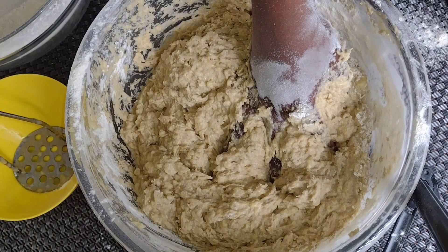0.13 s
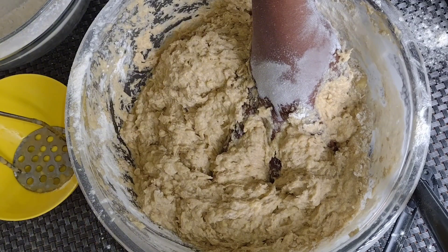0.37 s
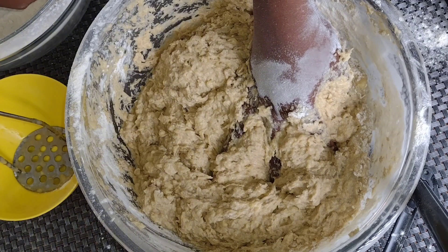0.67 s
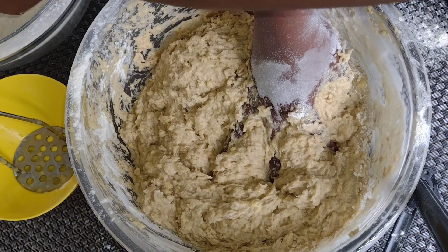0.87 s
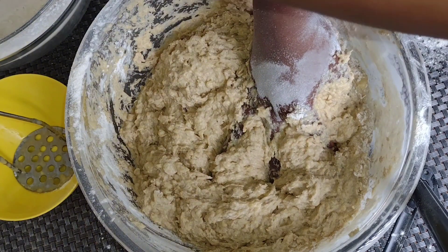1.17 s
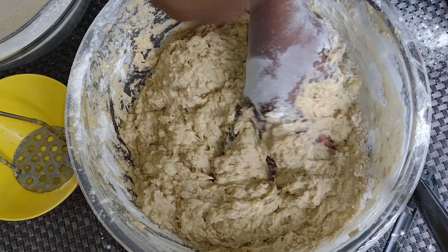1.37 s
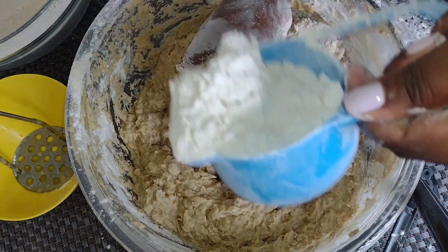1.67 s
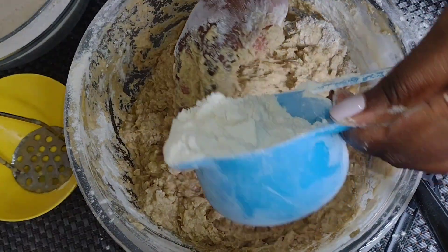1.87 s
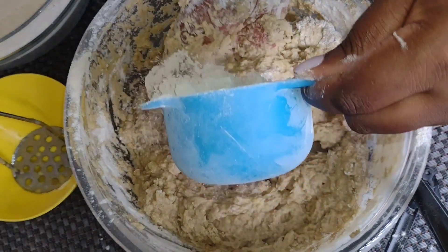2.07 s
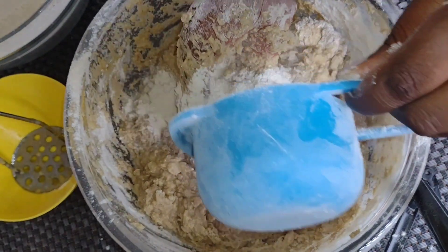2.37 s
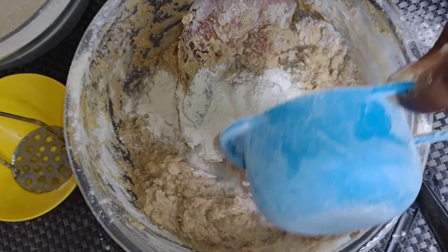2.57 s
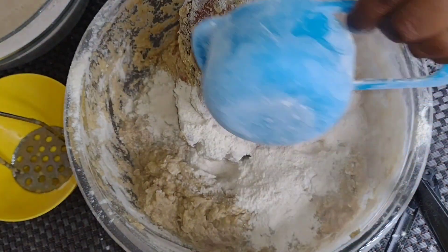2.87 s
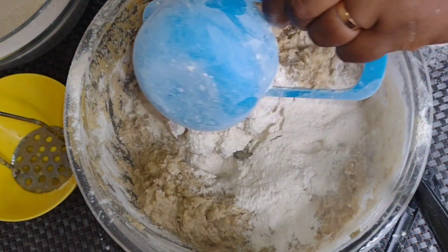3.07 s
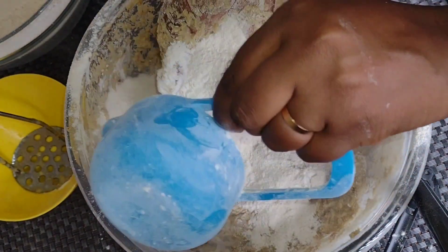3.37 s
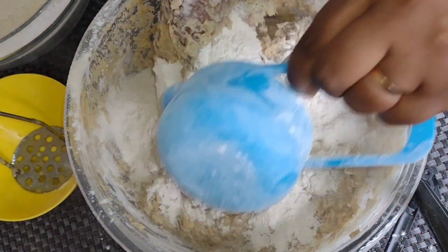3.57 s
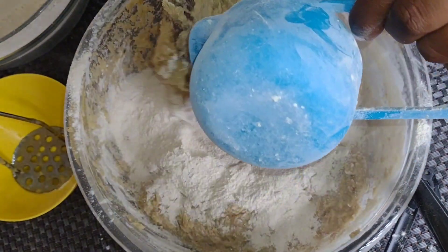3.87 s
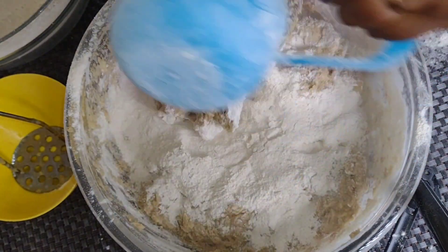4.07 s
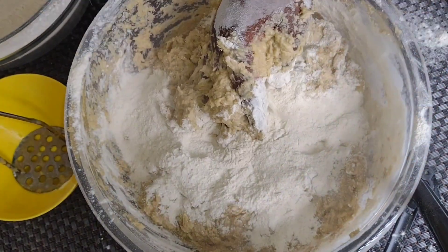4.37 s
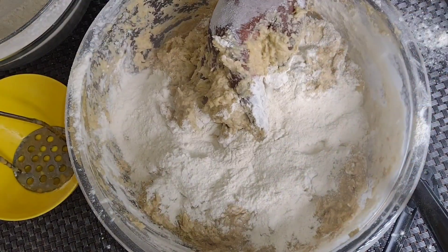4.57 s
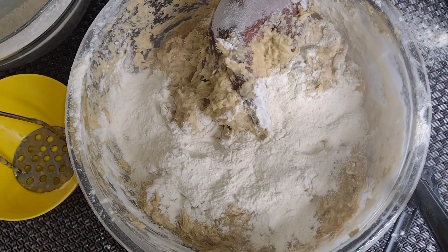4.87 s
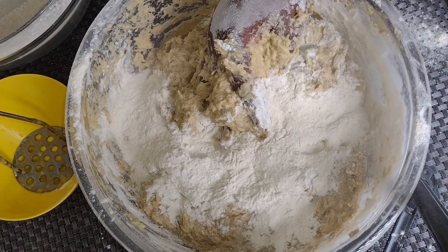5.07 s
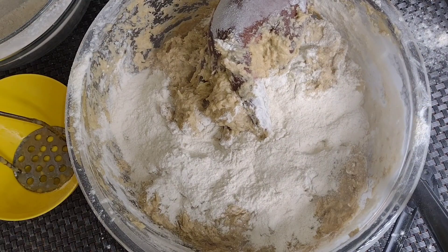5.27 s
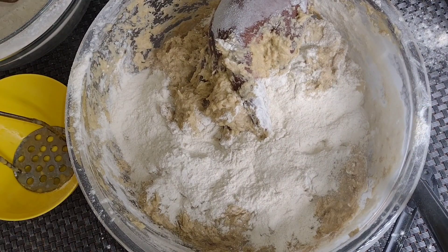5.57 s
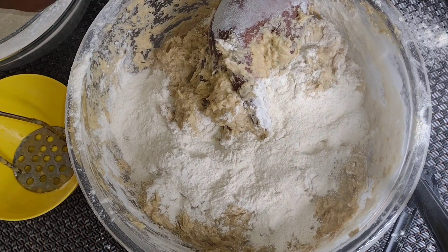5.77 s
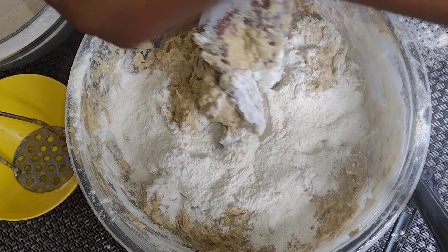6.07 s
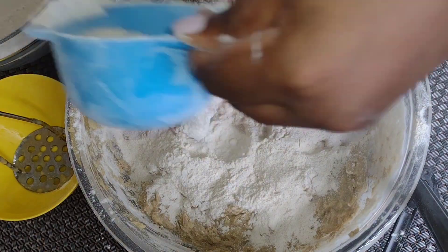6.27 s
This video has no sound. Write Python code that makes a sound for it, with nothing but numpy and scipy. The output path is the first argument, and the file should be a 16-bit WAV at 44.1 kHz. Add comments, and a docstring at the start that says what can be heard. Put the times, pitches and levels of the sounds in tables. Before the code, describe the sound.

Quiet kitchen with a low throbbing hum; flour hisses and a cup bumps the dough bowl, then a loud, high bird trill rises and slows.

```python
"""From the start a kitchen rumbles and hisses softly under a low, throbbing hum; a bird peeps, others whistle far off.
A hand pushes the dough with dull, low noise; flour and sticky dough hiss in fine grains and tick.
Then hand and plastic cup rub dough and bowl: bursts of tiny slips that ring the bowl's damped resonances.
The bird swells into a rising two-voiced trill that slows and rings round the room, built from swept sines.
At its height a second bird joins in with shorter, evenly spaced calls."""
import sys
import numpy as np
from scipy import signal
from scipy.fft import rfft, irfft, next_fast_len
from scipy.io import wavfile

SR = 44100
rng = np.random.default_rng(int(sys.argv[2]) if len(sys.argv) > 2 else 0)


def file_out(sig):
    """Save sig as 16-bit WAV at sys.argv[1]."""
    # one column per channel
    cols = np.atleast_2d(sig).T
    # limit, then scale
    lim = np.clip(cols, -1, 1)
    pcm = np.round(lim * 32767).astype(np.int16)
    wavfile.write(sys.argv[1], SR, pcm)


N = 283122
TIME = np.arange(N) / SR

# Swell of the room's low rumble. Each row: time in seconds, level in dB before the rumble's trim.
RUMBLE_SWELL = [(0.0, -61), (1.66, -63), (1.77, -57.5), (3.59, -63), (4.08, -57), (5.63, -59),
                (6.24, -51.5), (6.42, -59)]
# Spectrum of the rumble. Each row: frequency in Hz, relative gain in dB.
RUMBLE_COLOUR = [(15, -69), (25, -37), (91, -4.5), (128, 1.5), (142, -1), (162, -11), (195, -21),
                 (264, -13), (346, -15), (423, -20), (501, -18), (583, -23), (679, -17.5), (738, -23.5),
                 (1400, -38), (1820, -42), (3080, -120)]
# Resonances of the room. Each row: frequency in Hz, width in Hz, level in dB.
ROOM_MODES = [(100.4, 60, -76.5), (178.7, 17, -70.5), (273.5, 4.5, -75), (343.6, 4.7, -70.5)]
# Spectrum of the thin hiss. Each row: frequency in Hz, relative gain in dB.
AIR_COLOUR = [(300, -6), (1000, 0), (1600, -3), (2600, -3.5), (4500, -9.5), (8000, -13.5), (15500, -15.5)]
# Likeness of the room noise at both ears. Each row: frequency in Hz, left-right correlation.
EAR_LIKENESS = [(60, .99), (150, .98), (280, .78), (500, .42), (1000, -.1), (2500, 0), (16000, 0)]
# Swell of the hum. Each row: time in seconds, level in dB before the hum's trim and throb.
HUM_SWELL = [(0, -60), (.7, -58.5), (1.2, -64.5), (1.95, -54), (2.5, -61.5), (3.8, -56.5), (4.16, -44.5),
             (4.38, -57.5), (5.35, -50.5), (5.8, -54.5), (6.13, -40), (6.42, -55)]
# Far whistles. Each row: start in seconds, middle pitch in Hz, level in dB.
FAR_WHISTLES = [(0.045, 2500, -73.5), (.26, 2135, -79), (.76, 2344, -76), (1.2, 2353, -75),
                (1.629, 2970, -74), (2.1, 3020, -68.5), (2.59, 2990, -67.5), (2.96, 6300, -68),
                (3.175, 2393, -71.5), (3.39, 5520, -63)]
# Dull pushes of the hand into the dough. Each row: start in seconds, length in seconds, centre in Hz, level in dB.
PUSHES = [(0.447, 0.52, 366, -61.5), (1.777, 0.28, 228, -66), (3.148, 0.19, 322, -61),
          (4.021, 0.18, 226, -55)]
# Soft hisses of flour and sticky dough. Each row: start in seconds, length in seconds, centre in Hz, level in dB.
HISSES = [(.86, .08, 8000, -76), (1.441, .36, 6900, -69), (1.99, .093, 3060, -64.5),
          (2.076, 0.09, 5170, -66), (2.378, .18, 4730, -70), (2.497, 0.53, 5100, -76),
          (3.06, .66, 5550, -67.5), (3.299, 2.4, 4700, -73.5)]
# Sticky ticks. Each row: start in seconds, level in dB before a lift of 3 dB.
TICKS = [(1.461, -68), (1.588, -68), (1.653, -64), (1.697, -68), (1.918, -69), (2.136, -67), (3.14, -69)]
# Rubs of hand and cup on dough and bowl. Each row: start in seconds, time to fall 60 dB in seconds, level in dB.
RUBS = [(1.753, 0.58, -48), (2.0, 1.05, -72), (2.142, 0.28, -63.5), (2.235, 0.46, -59.5), (3.4, 0.081, -69),
        (4.15, 1.14, -62.5), (4.49, 0.97, -69), (4.67, 0.7, -69), (5.95, 2.7, -68.5)]
# Spectrum of the rubbing slips. Each row: frequency in Hz, relative gain in dB.
RUB_COLOUR = [(240, -53), (400, -33), (593, -2), (867, 1.5), (1010, -14), (1090, -13.5), (3010, -5),
              (3450, -12), (6820, -17), (15000, -38.5)]
# Bowl resonances before the dough damps them. Each row: frequency in Hz, width in Hz, relative gain in dB.
BOWL_MODES = [(778, 15, 3.5), (1110, 62, 9.5), (1950, 200, -1), (2410, 100, -3), (3220, 59, -58),
              (5430, 63, -23)]
# Single peeps. Each row: start in seconds, length in seconds, end pitch in Hz, level in dB.
PEEPS = [(0.0, 0.015, 7370, -59), (0.132, 0.032, 7130, -66), (.3, 0.043, 7190, -73),
         (0.461, .044, 7180, -74.5), (0.976, 0.038, 7920, -62), (1.268, .085, 7850, -69.5),
         (1.504, .077, 7520, -70.5), (1.681, 0.076, 7200, -66.5), (1.922, .074, 7120, -66),
         (2.214, 0.096, 6900, -73)]
# The trill, slowing as it goes. Each row: start of a rising syllable in seconds.
TRILL_STARTS = [3.552, 3.7, 3.855, 4.022, 4.171, 4.339, 4.512, 4.678, 4.851, 5.032, 5.22, 5.428, 5.65,
                5.885, 6.115, 6.35]
# Loudness of the trill. Each row: time in seconds, level in dB.
TRILL_LEVEL = [(3.55, -54.5), (4.17, -52.5), (4.55, -48), (5.2, -36.5), (5.42, -35), (5.9, -41),
               (6.36, -43.5)]

AIR_DB = -73.3
# the hum's even throb, with random unsteadiness on top
THROB_GAP_S, THROB_CREST_S, THROB_DB, UNSTEADY_DB = .355, 4.9, 3, 2.5
WHISTLE_S = .135
HISS_WIDTH_HZ, HISS_MIDDLE_HZ = 4000, 4770  # width at a middling centre; higher hisses spread much wider
CLUMP_DB, CLUMP_RATE_HZ = 2.2, 40  # the grains come in clumps
RUB_RISE_SHARE = .041  # of the fall time: slow strokes also start slowly
PEEP_FOOT_HZ = 6620  # every peep rises from here
PAUSE_S = .052  # between syllables, so they lengthen as the trill slows
SCATTER = .0201  # of pitch, from one syllable to the next
SOFT_DB, EFFORT_RANGE_DB = -52, 10  # effort goes from 0 to 1 over this range
TRILL_FOOT_HZ, SOFT_TOP_HZ, LOUD_TOP_HZ = 5360, 6695, 7370  # before scatter; effort lifts the top
UPPER_VOICE_DB = -11  # against the lower voice
ANSWER_COUNT, ANSWER_START_S, ANSWER_GAP_S = 6, 5.374, .195
ANSWER_LENGTH_S, ANSWER_FOOT_HZ, ANSWER_TOP_HZ = .093, 5420, 6935
ANSWER_DB, ANSWER_STEP_DB = -33.5, -1.92  # each call weaker than the last
BEAK_HZ, BEAK_WIDTH_HZ = 12900, 1700  # the beak favours this band of the overtone
# the song's echo: fall time, level over the direct sound, delay at the left ear, share from the bird's side
SONG_T60_S, SONG_WET_DB, SONG_LAG_SAMPLES, SONG_AIMED = .52, 7, 19, .12
EDGE_HZ = 15700


def gain_of(db):
    """Decibels to gain."""
    return 10 ** (np.asarray(db) / 20)


def evened(x):
    """Scales to rms 1."""
    return x / np.sqrt(np.mean(x ** 2) + 1e-20)


def read(points, hz):
    """Reads a table on a log-frequency axis."""
    f, value = np.transpose(points)
    return np.interp(np.log(hz + 1), np.log(f + 1), value)


def level_over_time(points):
    """Draws a table as a line of dB over the whole scene."""
    return np.interp(TIME, *np.transpose(points))


def add(mix, s, sound):
    """Mixes a sound in at time s."""
    part = mix[round(s * SR):][:len(sound)]
    part += sound[:len(part)]


def coloured(x, shape):
    """Filters by a gain that is a function of Hz; rms 1."""
    size = next_fast_len(N)
    spectrum = rfft(x, size) * shape(np.fft.rfftfreq(size, 1 / SR))
    return evened(irfft(spectrum, size)[..., :N])


def bell(f, hz, width):
    """Gain of a resonance; width is at half gain."""
    return 1 / (1 + (2 * (f - hz) / width) ** 2)


def wander(rate_hz):
    """Slow chance, rms 1."""
    return coloured(rng.standard_normal(N), lambda f: np.exp(-(f / rate_hz) ** 2))


def diffuse(shape):
    """Noise from all round: the bass is alike at both ears, the treble is not."""
    size = next_fast_len(N)
    f = np.fft.rfftfreq(size, 1 / SR)
    a, b = rfft(rng.standard_normal((2, size)))
    same = read(EAR_LIKENESS, f)
    ears = np.array([a, same * a + np.sqrt(1 - same ** 2) * b])
    return evened(irfft(ears * shape(f), size)[:, :N])


def room(x, t60, wet_db, lag=0, aimed=0):
    """Direct sound, lag samples later at the left ear, plus dense echoes; the aimed share shares its side."""
    t = TIME[:SR]
    taps = rng.standard_normal((3, SR)) * (rng.random((3, SR)) < 4000 / SR)
    taps *= gain_of(-60 * t / t60) * (1 - np.exp(-t / .00064))
    taps /= np.linalg.norm(taps, axis=1, keepdims=True)
    tail = gain_of(wet_db) * signal.fftconvolve(x[None], taps, axes=1)[:, :N]
    front = x + np.sqrt(aimed) * tail[2]
    ears = np.array([np.interp(TIME - lag / SR, TIME, front), front])
    return (ears + np.sqrt(1 - aimed) * tail[:2]) / np.hypot(1, gain_of(wet_db))


def grains(per_s, spread_db):
    """A dense train of tiny slips of uneven size."""
    hits = rng.standard_normal(N) * (rng.random(N) < per_s / SR)
    size_db = spread_db * np.minimum(rng.exponential(1, N), 4)
    return evened(hits * gain_of(size_db))


def syllable(length, first_hz, last_hz, arch, waver, rough, rasp_hz, overtone_db=-60, edge=.5):
    """A rising whistle with a fast random rasp; positive arch climbs early, negative arch climbs late."""
    u = np.linspace(0, 1, int(length * SR))
    hz = first_hz + (last_hz - first_hz) * (u + arch * u * (1 - u))
    hz = hz * (1 + waver * np.interp(u, np.linspace(0, 1, 64), rng.standard_normal(64)))
    phase = 2 * np.pi * np.cumsum(hz) / SR
    low_pass = signal.butter(3, rasp_hz, fs=SR)
    rasp = evened(signal.lfilter(*low_pass, rng.standard_normal((2, SR // 4)))[:, :len(u)])
    tone = np.sin(phase) + rough * (rasp[0] * np.sin(phase) + rasp[1] * np.cos(phase))
    overtone = gain_of(overtone_db) * bell(2 * hz, BEAK_HZ, BEAK_WIDTH_HZ) * np.sin(2 * phase)
    return (tone + overtone) * signal.windows.tukey(len(u), edge)


def rumble(trim_db=3, dip=.49):
    """Low noise and the room's own resonances swell together; a thin hiss follows a little."""
    swell = gain_of(level_over_time(RUMBLE_SWELL))
    body = diffuse(lambda f: gain_of(read(RUMBLE_COLOUR, f)) * (1 - dip * bell(f, 125, 60)))
    modes = sum(gain_of(db) * diffuse(lambda f: bell(f, hz, width)) for hz, width, db in ROOM_MODES)
    air = evened(swell) ** .4 * diffuse(lambda f: gain_of(read(AIR_COLOUR, f)))
    return gain_of(trim_db) * swell * body + evened(swell) * modes + gain_of(AIR_DB) * air


def hum(hz=130, waver_hz=4.4, trim_db=-3.5):
    """One low sine that wavers in pitch and swells in short throbs."""
    phase = 2 * np.pi * np.cumsum(hz + waver_hz * wander(rate_hz=13.73)) / SR
    throb_db = THROB_DB * np.cos(2 * np.pi * (TIME - THROB_CREST_S) / THROB_GAP_S)
    throb_db += UNSTEADY_DB * wander(rate_hz=10)
    return gain_of(trim_db + level_over_time(HUM_SWELL) + throb_db) * evened(np.sin(phase))


def far_birds():
    """Gently rising, slightly hoarse whistles, heard mostly as echo."""
    song = np.zeros(N)
    for s, hz, db in FAR_WHISTLES:
        note = syllable(WHISTLE_S, hz - 80, hz + 75, arch=.8, waver=.013, rough=.4, rasp_hz=150, edge=.7)
        add(song, s, gain_of(db) * evened(note))
    return room(song, t60=.65, wet_db=8)


def pushes():
    """Dough gives way with a soft, low rustle of band-limited noise."""
    out = np.zeros(N)
    for s, length, hz, db in PUSHES:
        n = int(length * SR)
        give = coloured(rng.standard_normal(N), lambda f: bell(f, hz, .82 * hz))
        add(out, s, gain_of(db) * give[:n] * signal.windows.tukey(n, .8))
    return room(out, t60=.4, wet_db=-3)


def flour():
    """Powder slides and sticky dough parts in fine, uneven grains, with a few sharper ticks."""
    out = np.zeros(N)
    clumps = evened(gain_of(CLUMP_DB * wander(CLUMP_RATE_HZ)))
    for s, length, hz, db in HISSES:
        n = int(length * SR)
        width = HISS_WIDTH_HZ * (hz / HISS_MIDDLE_HZ) ** 2
        hiss = coloured(grains(per_s=2500, spread_db=3), lambda f: bell(f, hz, width))
        add(out, s, gain_of(db) * hiss[:n] * np.sqrt(np.hanning(n)))
    out *= clumps
    snap = coloured(rng.standard_normal(N), lambda f: bell(f, 6200, 21000))
    t = TIME[:1024]
    for k, (s, db) in enumerate(TICKS):
        fall = gain_of(db + 3 - 60 * t / .014)  # 60 dB in 14 ms
        add(out, s, fall * snap[k * len(t):][:len(t)])
    return room(out, t60=.35, wet_db=-1)


def bowl_ring(f):
    """Gain of the bowl's resonances, which the dough damps and widens."""
    return 1 + .7 * sum(gain_of(db) * bell(f, hz, width + 30) for hz, width, db in BOWL_MODES)


def rubs():
    """Each stroke is a burst of slips that rings the bowl, rising quickly and dying away."""
    force = np.zeros(N)
    for s, t60, db in RUBS:
        rise = RUB_RISE_SHARE * t60
        fall_db = np.minimum(-60 * (TIME - s - rise) / t60, 0)
        force += gain_of(db + fall_db) * np.clip((TIME - s) / rise, 0, 1)
    slips = coloured(grains(per_s=4000, spread_db=2), lambda f: gain_of(read(RUB_COLOUR, f)) * bowl_ring(f))
    return room(force * slips, t60=.53, wet_db=-.5)


def swelled(note, start_db, end_db, crest=.49):
    """Air pressure bends the level between start, crest (share of the note) and end; rms 1."""
    u = np.linspace(0, 1, len(note))
    return evened(note * gain_of(np.interp(u, [0, crest, 1], [start_db, 0, end_db])))


def effort_of(db):
    """How hard a bird sings, 0-1."""
    return np.clip((db - SOFT_DB) / EFFORT_RANGE_DB, 0, 1)


def two_voices(length, first, last, db):
    """Both sides of the syrinx sweep up together; louder song spreads them apart and turns purer."""
    effort = effort_of(db)
    ratio = 1.15 + effort * (1.26 - 1.15)  # upper pitch over lower
    rough = .71 + effort * (.14 - .71)
    overtone_db = -36 + effort * (-25 + 36)
    arch = rng.uniform(.35, .75)
    first, last = np.array([first, last]) * (1 + SCATTER * rng.uniform(-.994, 1, 2))
    lower = syllable(length, first, last, arch, waver=.011, rough=rough, rasp_hz=650,
                     overtone_db=overtone_db, edge=.2)
    # the upper voice starts 8 % wider than it ends
    upper = syllable(length, first * ratio * 1.08, last * ratio, arch, waver=.009, rough=rough,
                     rasp_hz=400, edge=.2)
    both = swelled(lower, -11.5, -5, crest=.61) + gain_of(UPPER_VOICE_DB) * swelled(upper, -1.5, -8.5)
    return gain_of(db) * evened(both)


def peeps(song):
    """The first bird's short, single-voiced notes climb late and carry a stronger overtone."""
    for s, length, top, db in PEEPS:
        peep = syllable(length, PEEP_FOOT_HZ, top, arch=-.26, waver=.0084, rough=.29, rasp_hz=207,
                        overtone_db=-16, edge=.16)
        add(song, s, gain_of(db) * swelled(peep, -.5, 1.4, crest=.71))


def trill(song):
    """The first bird's two-voiced syllables reach higher as it sings harder."""
    gaps = np.diff(TRILL_STARTS)
    for s, gap in zip(TRILL_STARTS, [*gaps, gaps[-1]]):
        db = np.interp(s, *np.transpose(TRILL_LEVEL))
        top = SOFT_TOP_HZ + effort_of(db) * (LOUD_TOP_HZ - SOFT_TOP_HZ)
        add(song, s, two_voices(gap - PAUSE_S, TRILL_FOOT_HZ, top, db))


def answers(song):
    """The second bird repeats one two-voiced call at an even pace."""
    for k in range(ANSWER_COUNT):
        call = two_voices(ANSWER_LENGTH_S, ANSWER_FOOT_HZ, ANSWER_TOP_HZ, ANSWER_DB + k * ANSWER_STEP_DB)
        add(song, ANSWER_START_S + k * ANSWER_GAP_S, call)


def near_birds():
    """Both near birds ring round the room, a little stronger and earlier at the right ear."""
    song = np.zeros(N)
    peeps(song)
    trill(song)
    answers(song)
    ears = room(song, t60=SONG_T60_S, wet_db=SONG_WET_DB, lag=SONG_LAG_SAMPLES, aimed=SONG_AIMED)
    return ears * gain_of([[-1.3], [1.3]])


def scene():
    """Room, dough work and birds together."""
    return rumble() + hum() + far_birds() + pushes() + flour() + rubs() + near_birds()


def record(dry):
    """The recorder's band limit: a steep low-pass."""
    low_pass = signal.firwin(511, EDGE_HZ, window=("kaiser", 9), fs=SR)
    return signal.oaconvolve(dry, low_pass[None], "same")


dry = scene()
out = record(dry)
file_out(out)
```